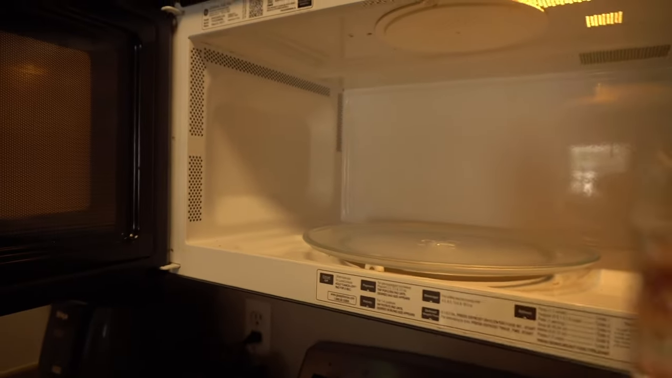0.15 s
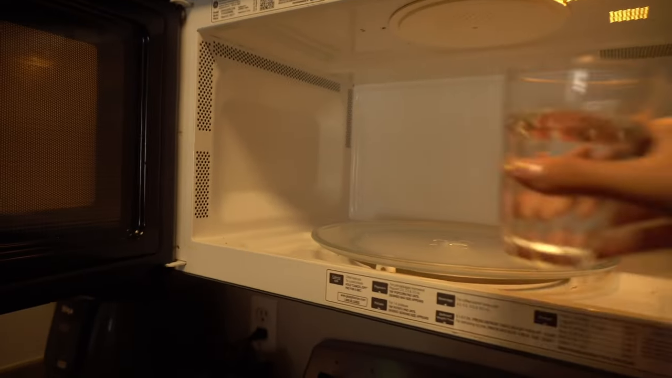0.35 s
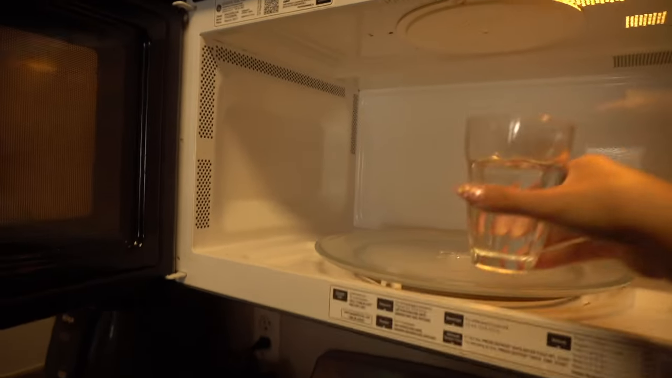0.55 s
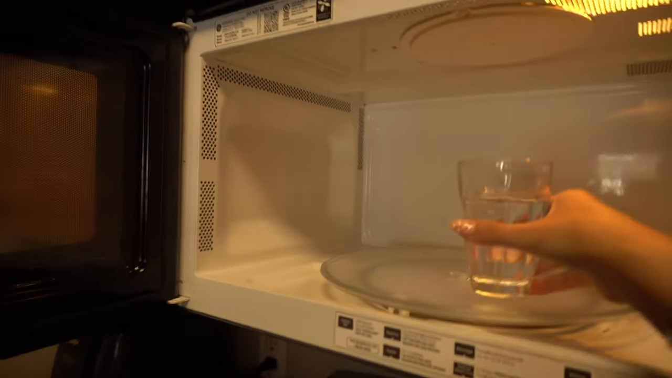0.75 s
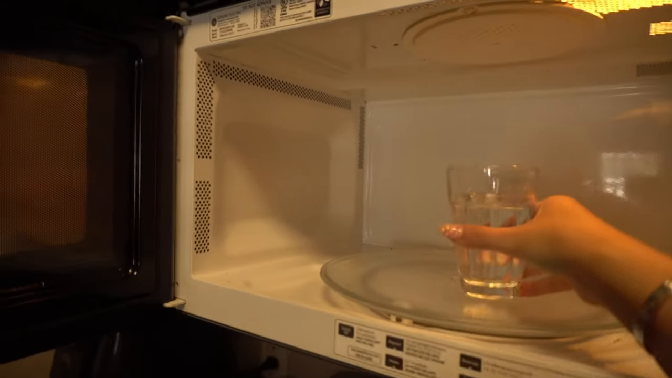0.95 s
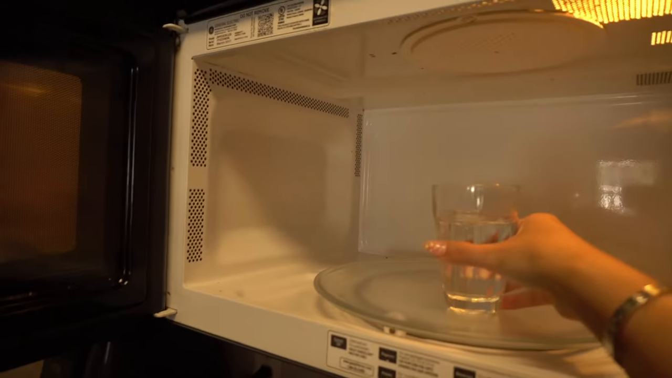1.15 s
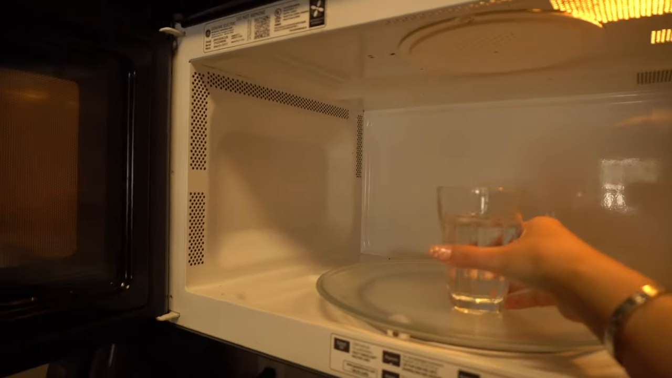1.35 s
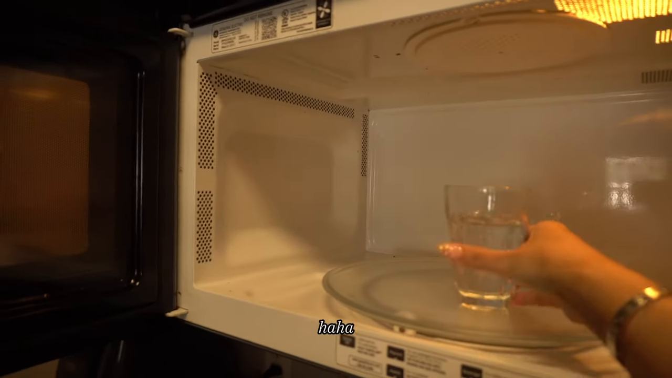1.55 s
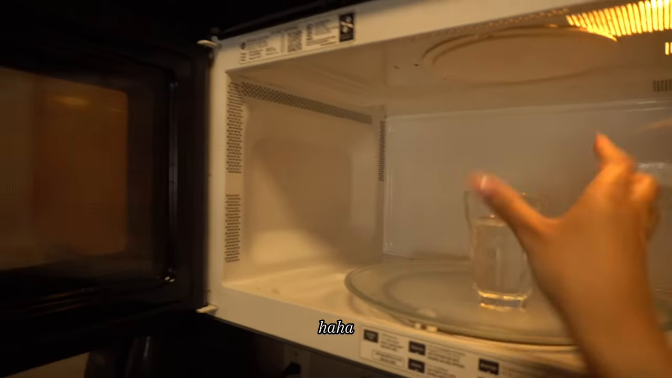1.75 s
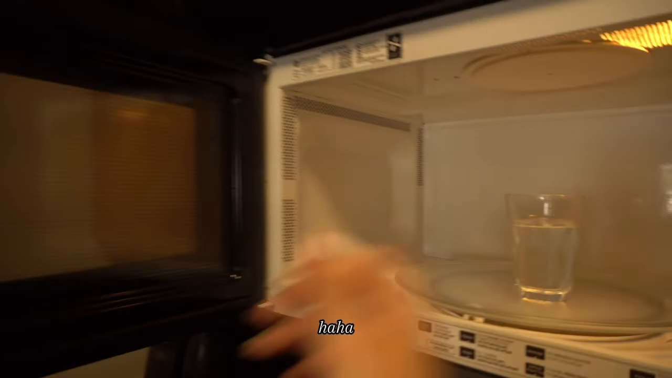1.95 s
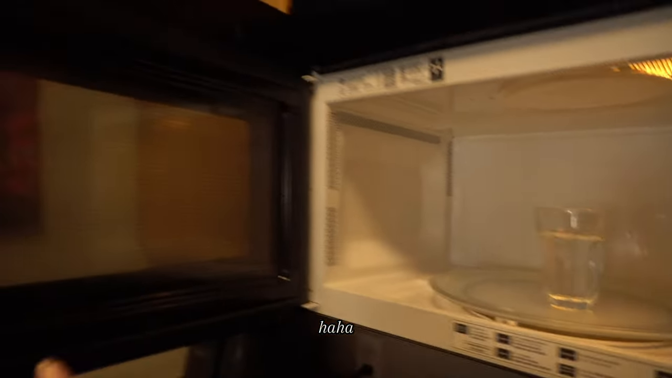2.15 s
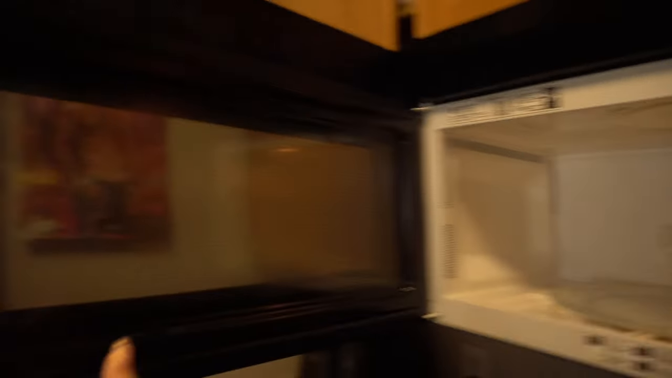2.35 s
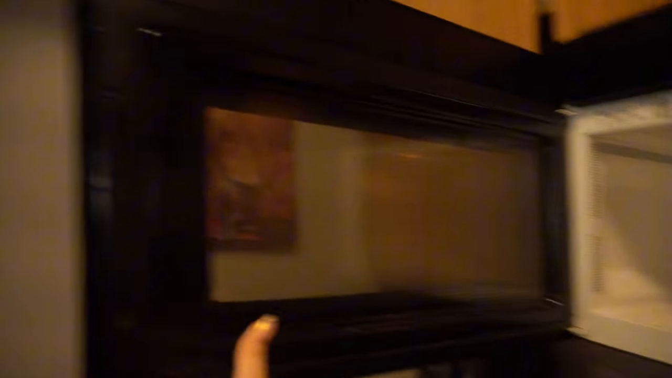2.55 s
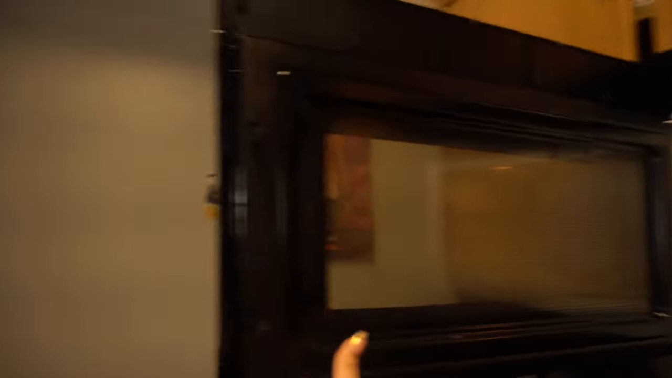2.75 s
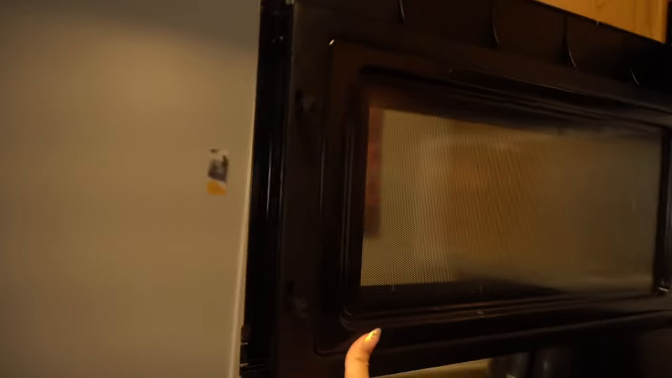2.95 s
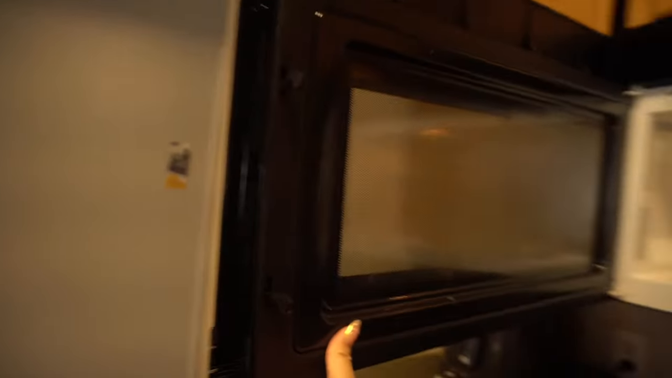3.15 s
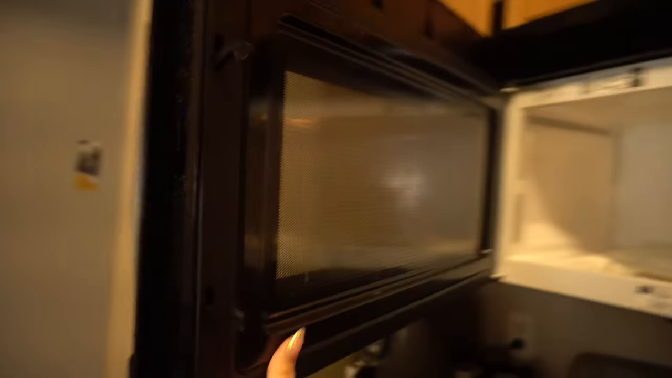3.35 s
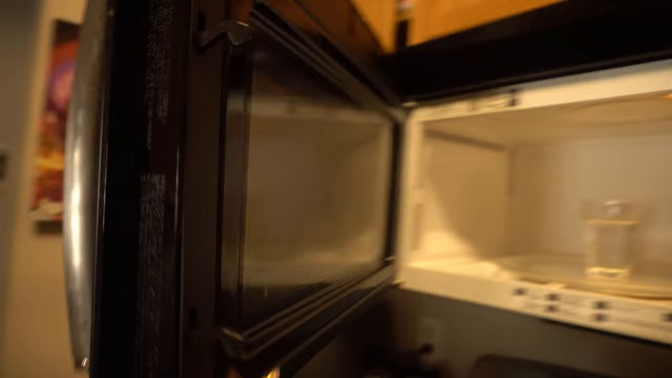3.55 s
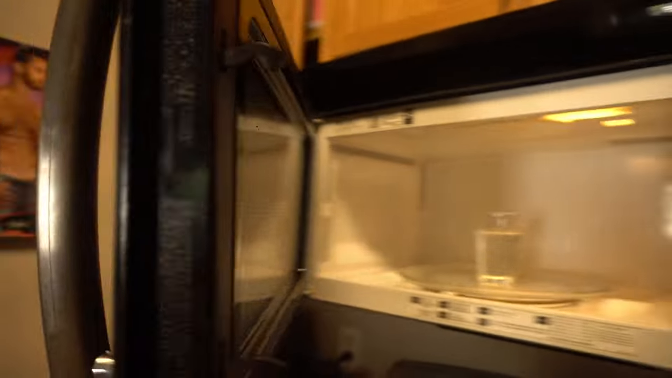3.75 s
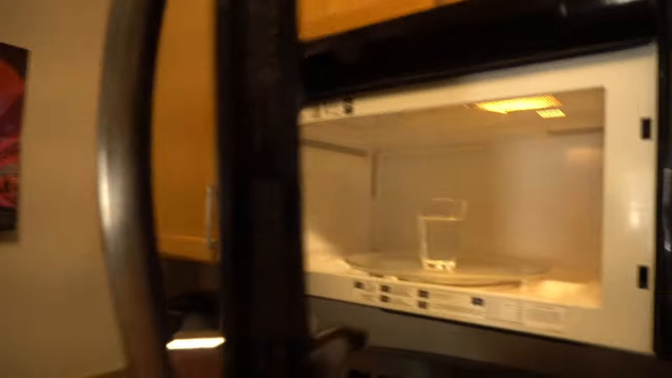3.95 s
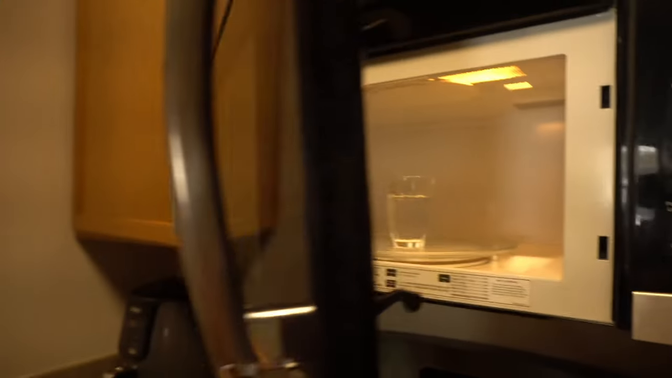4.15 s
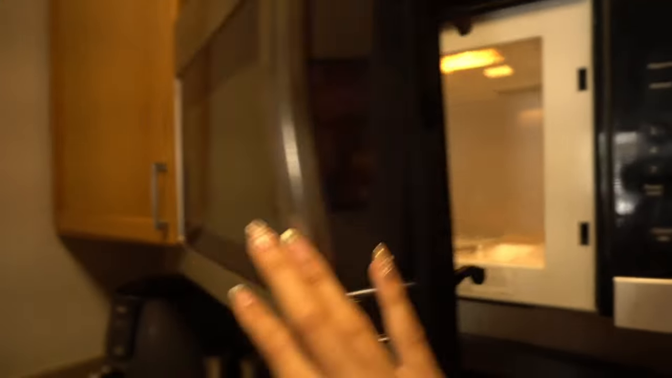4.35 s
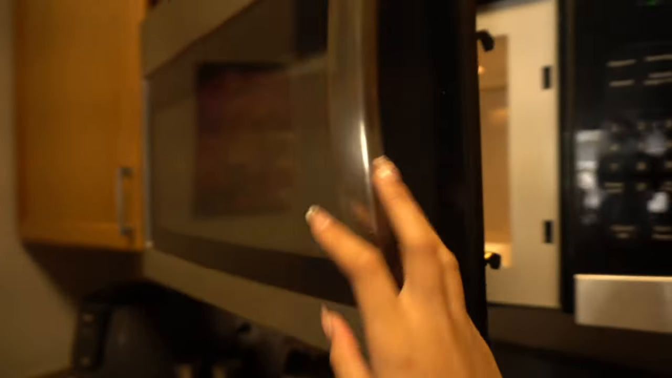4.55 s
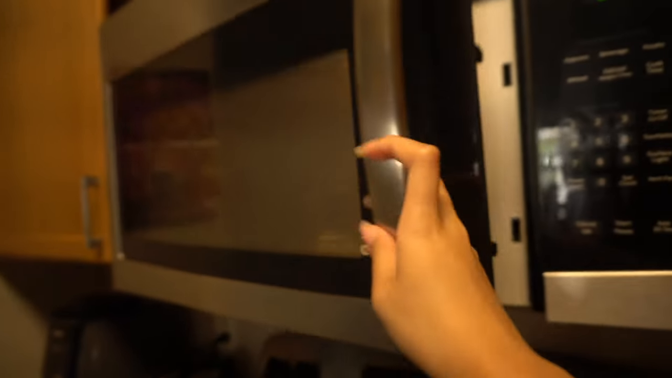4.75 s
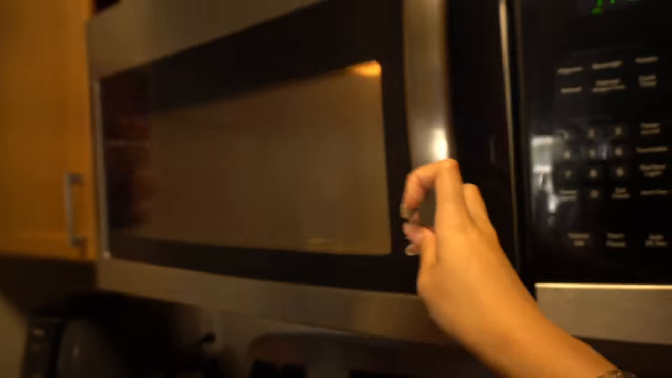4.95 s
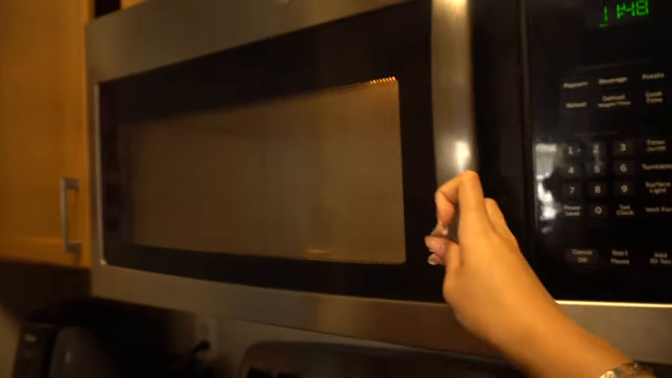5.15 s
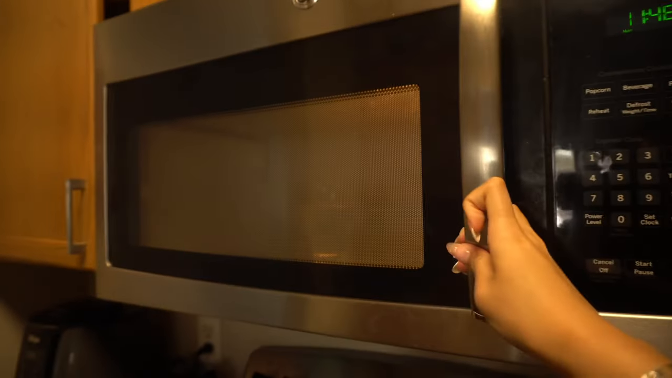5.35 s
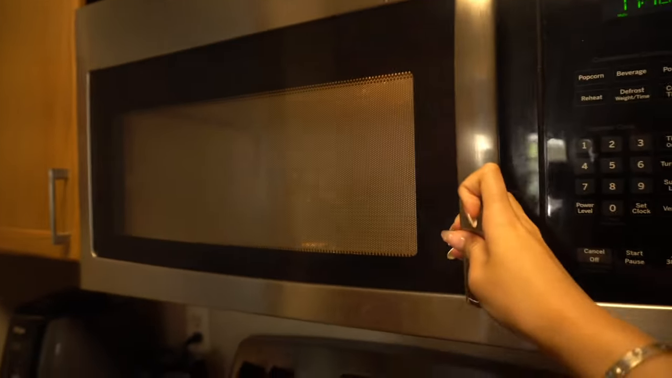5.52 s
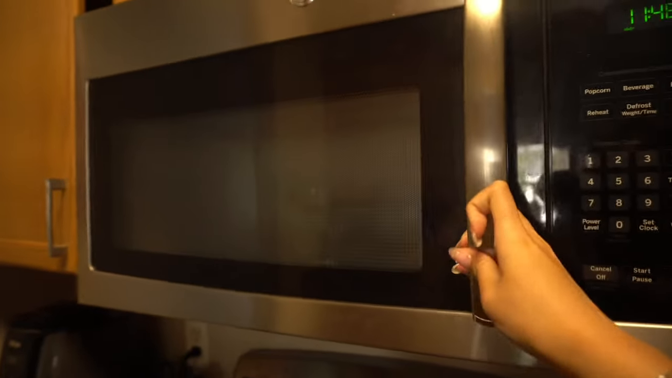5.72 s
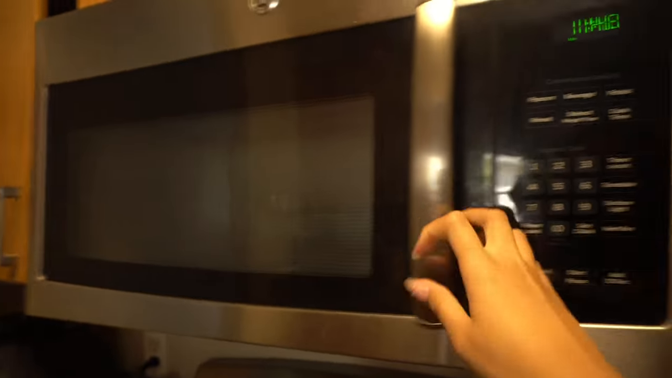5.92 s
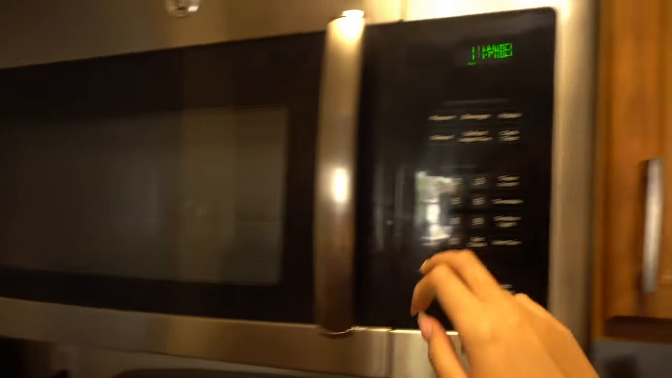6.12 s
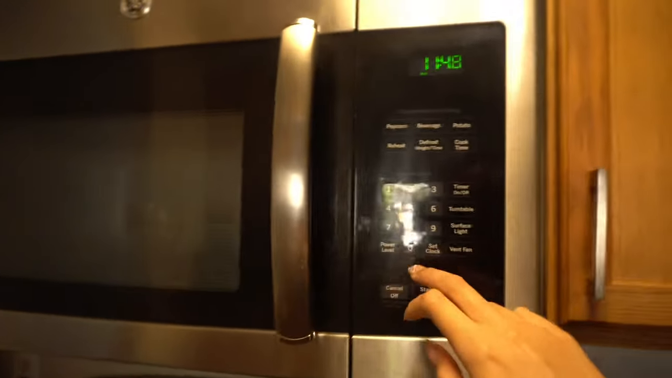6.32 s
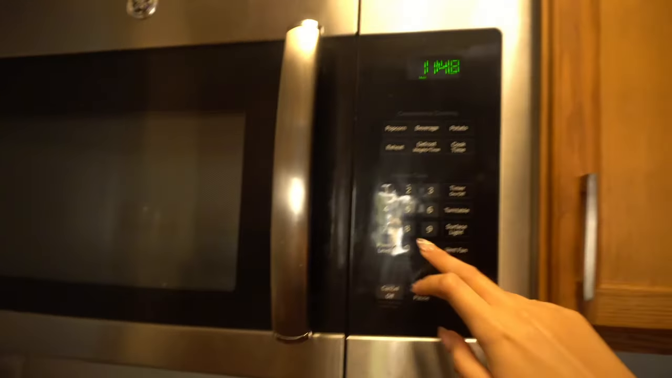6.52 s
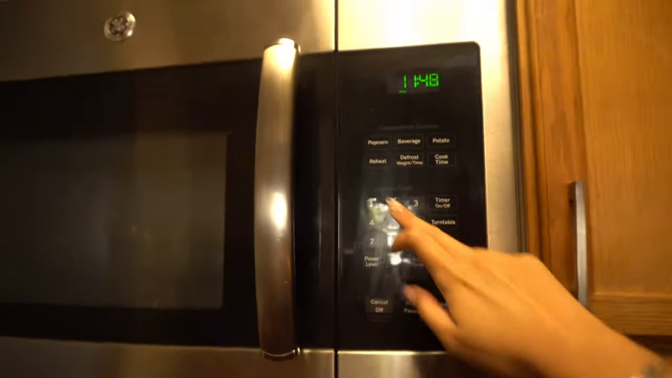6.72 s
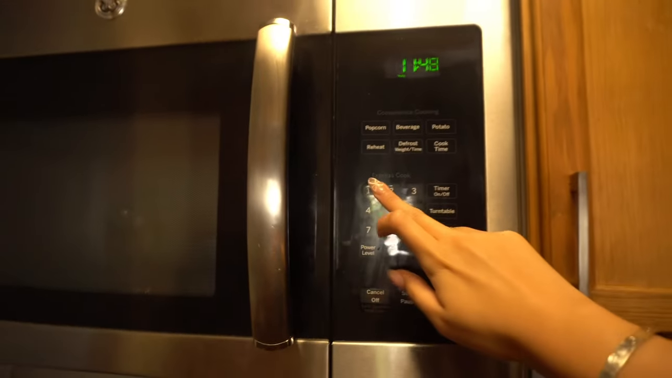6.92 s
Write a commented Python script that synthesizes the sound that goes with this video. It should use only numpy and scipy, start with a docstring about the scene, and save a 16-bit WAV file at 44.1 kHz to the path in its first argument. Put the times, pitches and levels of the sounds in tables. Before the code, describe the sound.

A glass of water clinks onto a microwave turntable, the plate rocks briefly, then the door squeaks and slams shut with a loud booming clack.

```python
"""A glass of water lands on a microwave oven's turntable: two clinks of ringing modes, then the plate rocks.
The door bumps its hinge stop, squeaks as it is swung round and is pushed shut: noise bursts for the latch
cracks, dying sines for the steel case that booms and rings, small cracks for loose parts that rattle.
A quiet, ringing kitchen (decaying noise as echoes) with rumble, hiss and hum; soft scuffs, small dry ticks."""
import sys
import numpy as np
from scipy import signal
from scipy.fft import rfft, irfft, next_fast_len
from scipy.io import wavfile

SR = 44100
rng = np.random.default_rng(int(sys.argv[2]) if len(sys.argv) > 2 else 0)


def inscribe(sig):
    """Save sig as 16-bit PCM at rate SR to the path in sys.argv[1].

    A 1-D sig is mono; a 2-D sig holds one channel per row.
    Samples are clipped to [-1, 1] before scaling.
    """
    pcm = np.round(np.clip(np.atleast_2d(sig).T, -1, 1) * 32767)
    wavfile.write(sys.argv[1], SR, pcm.astype(np.int16))


N = 307818
AGE = np.arange(SR) / SR  # the second after a blow

# how alike left and right are: pitch_hz, likeness (0 to 1)
ALIKE = [(300, 1), (640, 0.9), (1400, 0.64), (3100, 0.9), (7000, 0.26), (16000, 0.55)]
# steel panels of the case: pitch_hz, level_db, t60_s
PANELS = [(269.7, -4, 0.6), (292.6, 6.5, 0.17), (324.5, -5, 0.78), (382, -3, 0.3), (391, -8, 0.76),
          (420.7, -7, 0.69), (488, 0, 0.39), (603, -1, 0.1), (705, -9, 0.17), (918, -3, 0.25)]
# crack of the plastic latch and frame: pitch_hz, density_db_per_hz
CRACK = [(50, 5.5), (200, 2.5), (300, 13.5), (560, 7), (1000, 5), (1400, -1), (2600, -2.5), (3700, -6),
         (5500, -14.5), (10000, -19.5), (16000, -36.5)]
SHUT_S = 5.6015  # the latch drops home


def gain_of(db):
    """Decibels to amplitude."""
    return 10 ** (np.asarray(db) / 20)


def evened(x):
    """Scales to rms 1."""
    return x / np.sqrt(np.mean(x ** 2) + 1e-20)


def read(points, hz):
    """Reads a table on a log-frequency axis."""
    f, value = np.transpose(points)
    return np.interp(np.log(hz + 1), np.log(f + 1), value)


def add(mix, s, sound):
    """Mixes a sound in at time s, cut off at the end of the mix."""
    part = mix[:, round(s * SR):][:, :sound.shape[-1]]
    part += sound[..., :part.shape[1]]


def pan(db):
    """Left and right gains for a level difference; above zero is louder on the left."""
    return gain_of([[db / 2], [-db / 2]])


def fade(t, t60):
    """Falls by 60 dB in t60."""
    return np.exp(-np.log(1000) * t / t60)


def swell(rise):
    """Onset of a blow: the softer the contact, the slower the rise."""
    return 1 - np.exp(-AGE / rise)


def noise(colour, size, tilt_db=0, alike=ALIKE):
    """Stereo noise of rms 1 with a given spectrum, tilted per octave well above 500 Hz."""
    hz = np.fft.rfftfreq(size, 1 / SR)
    left, other = rfft(rng.standard_normal((2, size)))
    same = np.clip(read(alike, hz), -1, 1)
    right = same * left + np.sqrt(1 - same ** 2) * other
    spectrum_db = read(colour, hz) + tilt_db * np.log2(1 + hz / 500)
    return evened(irfft(np.array([left, right]) * gain_of(spectrum_db), size))


def burst(colour, t60, tilt_db=0, rise=0.000091):
    """The dense, quickly dying resonances of one contact, as fading noise."""
    return noise(colour, SR, tilt_db) * fade(AGE, t60) * swell(rise)


def ring(modes, rise, seconds=1):
    """Dying sines of alternating sign; a softer blow swells more slowly."""
    t = np.arange(seconds * SR) / SR
    sines = np.zeros(len(t))
    for k, (hz, db, t60) in enumerate(modes):
        sines += (-1) ** k * gain_of(db) * fade(t, t60) * np.sin(2 * np.pi * hz * t)
    return sines * (1 - np.exp(-t / rise))


def waver(step_s):
    """One second of a random curve of rms 1 that takes a new value every step."""
    steps = rng.standard_normal(SR)
    return evened(np.interp(AGE / step_s, np.arange(SR), steps))


def husky(hz, size):
    """Uneven slips smear a tone into a narrow band; each slip lasts size samples."""
    slips = evened(signal.fftconvolve(rng.standard_normal(SR), signal.windows.hann(size))[:SR])
    return slips * np.sin(2 * np.pi * np.cumsum(hz * np.ones(SR)) / SR)


def kitchen(x, build=0.0037):
    """Echoes of the oven cavity and the hard room: they thicken quickly, and the top treble dies first."""
    # dying of the echoes: pitch_hz, t60_s
    echo_t60 = [(60, 0.99), (150, 0.89), (400, 0.65), (1000, 0.7), (5000, 0.75), (9000, 0.53),
                (16000, 0.27)]
    hz, t, z = signal.stft(noise([(20, 0), (20000, 0)], SR), SR, nperseg=256)
    dying = z * fade(t, read(echo_t60, hz)[:, None])
    tail = signal.istft(dying, SR, nperseg=256)[1][:, :SR]
    # about as loud as the sound sent in, judged by the decay at 1 kHz
    tail *= swell(build) * np.sqrt(2 * np.log(1000) / (SR * read(echo_t60, 1000)))
    return signal.fftconvolve(x, tail, axes=1)[:, :x.shape[1]]


def air(level_db=-56.64):
    """Low rumble and hiss as steady coloured noise, with a faint mains hum of two sines."""
    # rumble and hiss: pitch_hz, density_db_per_hz
    air_colour = [(12, -30), (20, -4.5), (55, -0.5), (127, -15), (337, -16), (377, -18.5), (825, -22.5),
                  (2600, -30), (16000, -36.5)]
    # left and right differ more as the pitch rises: pitch_hz, likeness
    air_alike = [(60, 1), (130, 0.58), (290, 0.53), (640, 0.05)]
    # mains hum: pitch_hz, rms_level_db
    hum_tones = [(59.5, -73), (119, -68.5)]
    t = np.arange(N) / SR
    hum = np.zeros(N)
    for hz, db in hum_tones:
        hum += gain_of(db) * np.sqrt(2) * np.sin(2 * np.pi * (hz * t + rng.random()))
    return gain_of(level_db) * noise(air_colour, next_fast_len(N), alike=air_alike)[:, :N] + hum


def scuffs(wet_db=-1):
    """Short strokes that stick before they slip and one longer, grainy slide, a little way off."""
    # short strokes: start_s, level_db
    strokes = [(0.218, -55.5), (3.044, -53.5), (3.15, -55.5), (3.215, -44.5)]
    # friction: pitch_hz, density_db_per_hz
    friction = [(300, -13.5), (1100, -14), (1700, -3), (3000, -3.5), (7500, -10), (12000, -9), (16000, -19)]
    rise_s, t60_s, tilt_db = 0.0057, 0.27, -1  # tilt in dB per octave
    catch_hz, catch_db, catch_s = 1800, -2.5, 0.0147  # each stroke first scrapes in a narrow band
    slide_s, slide_length_s, slide_db = 3.335, 0.16, -48
    grain_db, grain_s = 0.5, .003  # uneven friction: rms depth, and length of one grain
    out = np.zeros((2, N))
    for s, db in strokes:
        catch_arch = np.sin(np.pi * np.minimum(AGE / catch_s, 1))
        catch = gain_of(catch_db) * catch_arch * husky(catch_hz, size=80)
        add(out, s, gain_of(db) * (catch + burst(friction, t60_s, tilt_db, rise_s)))
    # the slide speeds up and slows down in one arch
    speed = abs(np.sin(np.pi * np.minimum(AGE / slide_length_s, 1)))
    grain = evened(gain_of(grain_db * waver(grain_s)))
    add(out, slide_s, gain_of(slide_db) * speed * grain * noise(friction, SR))
    return out + gain_of(wet_db) * kitchen(out)


def ticks():
    """Dry, bright ticks close by; farther off, fingernails on the door are duller and the room answers."""
    # small ticks: start_s, level_db, distance_m (from the listener)
    contacts = [(0.7598, -37, 0.11), (2.45, -40.5, 0.37), (2.731, -38.5, 0.64), (2.785, -36.5, 0.57),
                (2.948, -33.5, 0.4), (3.781, -41.5, 0.52), (3.798, -37.5, 0.11), (4.0212, -41.5, 0.41),
                (4.593, -38, 0.87), (4.732, -37.5, 0.33), (6.5497, -53.5, 1), (6.7822, -35, 0.25),
                (6.786, -27, 0.14), (6.802, -47.5, 0.93)]
    # tick: pitch_hz, density_db_per_hz
    tick_colour = [(200, -26), (1000, 5.5), (3500, 2.5), (6000, -3.5), (10000, -5.5), (12500, -11.5),
                   (16000, -18)]
    room_radius_m = 0.94  # at this distance the room is as loud as the direct sound
    tilt_db, dulling_db = 4, 2.5  # brightness per octave there, and its loss with each doubling of distance
    t60_s, smear = .022, 0.262  # length there, and the power of distance by which it grows
    out, send = np.zeros((2, 2, N))
    for s, db, metres in contacts:
        far = metres / room_radius_m
        brightness_db = tilt_db - dulling_db * np.log2(far)
        tick = pan(1.4) * gain_of(db) * burst(tick_colour, t60_s * far ** smear, brightness_db)
        add(out, s, tick)
        add(send, s, far * tick)
    return out + kitchen(send)


def rocking(step_s=0.012, onset_s=.07):
    """The glass rocks at random, building up after each contact."""
    return waver(step_s) * swell(onset_s)


def flutter(depth=.3):
    """A gain that starts at one and wavers at random as the rocking builds up."""
    return 1 + depth * rocking()


def rocking_mode(hz, db, t60, rise, wobble_hz=11):
    """One plate mode under the rocking glass: the moving contact bends its pitch and its level."""
    turns = np.cumsum(hz + wobble_hz * rocking()) / SR
    return gain_of(db) * flutter() * fade(AGE, t60) * swell(rise) * np.sin(2 * np.pi * turns)


def glass(wet_db=-4, knock_wet_db=-8, knock_t60=0.13, clatter_db=-18, clatter_t60=0.35):
    """Contacts ring plate and tumbler: freely on the glass's edge, in a brief, higher flare once flat."""
    # glass on turntable: start_s, plate_db, knock_db (plate on its rollers), bright_db (extra near bright_hz)
    set_down = [(1.1586, -15, -26.5, -2.5), (1.194, -22, -24, -4), (1.226, -48, -25, 2),
                (1.2543, -13.5, -23.5, 5.5), (1.279, -32.5, -21.5, 16), (1.379, -36.5, -28.5, 3),
                (1.404, -38, -23.5, 2), (1.575, -51, -40, 7), (1.736, -69, -55, 1.5)]
    # turntable plate left undamped: pitch_hz, level_db, t60_s
    plate = [(1139, -8.5, .6), (1205, -1.5, 0.55), (1220, -12.5, 0.32), (1510, -24.5, .5),
             (1690, -22.5, 0.3), (1940, -16, 0.2), (2065, -5, 0.8), (3070, -8, 0.2), (3116, -16, 0.4),
             (3280, -17.5, .1), (3490, -22, .3), (4234, -21, 0.076)]
    # each part of the plate's ring leaves the cavity in its own direction: pitch_hz, left_minus_right_db
    plate_side = [(1200, -4.5), (2080, -9), (3100, -10)]
    # and reaches the room by its own share: pitch_hz, level_db
    plate_room = [(1200, -1.5), (2080, -10.5), (3100, -1.5)]
    # tumbler wall left undamped: pitch_hz, level_db, t60_s
    tumbler = [(4936, -7.5, 0.87), (5046, -7.5, 0.36), (5631, -9, 0.45), (6410, -6, 0.34),
               (6785, -16.5, 0.45), (7045, -20, 0.32), (8120, -12, 0.33), (8690, -22, .35),
               (9905, -20, 0.35), (11130, -24.5, 0.25), (11820, -25, .35), (13400, -25, .35),
               (14980, -25.5, .35)]
    # the plate's many weaker, crowded modes: pitch_hz, density_db_per_hz
    clatter = [(500, -21.5), (1400, 3.5), (3300, -3), (4500, -12.5), (7000, -31.5), (16000, -49.5)]
    # knock under the plate: pitch_hz, density_db_per_hz
    knock_colour = [(70, -20.5), (165, 3.5), (230, -11), (330, 4.5), (520, -6.5), (720, -0.5), (1000, -2),
                    (2000, -21.5), (16000, -59.5)]
    # roller ring and oven floor under the plate: pitch_hz, level_db, t60_s
    rollers = [(339.4, -4.5, .22), (457, -3.5, .1), (696.4, 2, 0.088), (861, -3, .14)]
    tumbler_db, rollers_db = -21, -5  # wall beside the plate (half of that once flat), rollers beside the knock
    bright_hz, bright_octaves = 2080, .2  # the part of the plate's ring that the flat base strikes best
    # the glass drops flat: its base stops the earlier ring, damps the later ones and raises their pitch
    flat_s, choke_t60_s, press_s, flat_rise_percent = 1.254, 0.051, 0.025, 0.64
    edge_rise_s, flat_rise_s = .0021, 0.0044  # the broad base strikes more softly than the edge
    out, send = np.zeros((2, 2, N))
    wall = sum(flutter() * ring([partial], rise=0.004) for partial in tumbler)
    for s, plate_db, knock_db, bright_db in set_down:
        flat = s >= flat_s
        if flat:
            damping = np.exp(-(AGE / press_s) ** 2)  # the base presses ever harder
            stiffening, rise, wall_share = 1 + flat_rise_percent / 100, flat_rise_s, 0.5
        else:
            damping = fade(np.maximum(s + AGE - flat_s, 0), choke_t60_s)
            stiffening, rise, wall_share = 1, edge_rise_s, 1
        for hz, db, t60 in plate:
            nearness = np.exp(-(np.log2(hz / bright_hz) / bright_octaves) ** 2)
            mode_db = plate_db + db + bright_db * nearness
            mode = damping * rocking_mode(hz * stiffening, mode_db, t60, rise)
            add(out, s, pan(read(plate_side, hz)) * mode)
            add(send, s, gain_of(read(plate_room, hz)) * mode)
        sparkle = pan(-1.5) * gain_of(plate_db + tumbler_db) * wall * damping * wall_share
        clink = sparkle + gain_of(plate_db + clatter_db) * burst(clatter, clatter_t60)
        # the plate tips and knocks dully on its rollers
        roller_ring = gain_of(rollers_db) * ring(rollers, rise=.005)
        knock = gain_of(knock_db) * (burst(knock_colour, knock_t60, rise=0.0073) + roller_ring)
        add(out, s, clink + knock)
        add(send, s, gain_of(wet_db) * clink + gain_of(knock_wet_db) * knock)
    return out + kitchen(send)


def hinge_stop(wet_db=-7, panel_db=-12, rise_s=0.0041, t60_s=0.18):
    """The door bumps its hinge stop: soft noise bursts, and steel panels whose ring is held short."""
    # bumps: start_s, level_db, brightness_db_per_octave
    bumps = [(2.634, -35.5, 4), (2.654, -37.5, 2.5), (2.672, -37, -16), (2.732, -32.5, 7)]
    # bump: pitch_hz, density_db_per_hz
    bump_colour = [(50, -17), (125, 4.5), (200, -30), (320, -2), (520, 0.5), (820, -8.5), (1000, -0.5),
                   (1400, -19.5), (2000, -22.5), (3000, -23.5), (6000, -36.5), (16000, -54)]
    out = np.zeros((2, N))
    held_panels = gain_of(panel_db) * fade(AGE, t60_s) * ring(PANELS, rise=rise_s)
    for s, db, tilt_db in bumps:
        add(out, s, gain_of(db) * (burst(bump_colour, t60_s, tilt_db, rise_s) + held_panels))
    return out + gain_of(wet_db) * kitchen(out)


def hinge_squeak(wet_db=-7):
    """The swinging hinge slips unevenly: a husky squeak, loud and high at the push, sinks over a low groan."""
    start_s, length_s, release_s = 4.592, 0.16, 0.01
    coasting_hz, push_hz, slowing_s = 1290, 167, 0.0418  # pitch, its rise at the push, time to settle
    coasting_db, push_db, push_peak_s, push_width_s = -63, 18, 0.029, 0.02  # level, and swell of the push
    groan_hz, groan_db, groan_t60_s = 316, -46, 0.76  # the door's frame
    out = np.zeros((2, N))
    hz = coasting_hz + push_hz * np.exp(-AGE / slowing_s)
    push = np.exp(-((AGE - push_peak_s) / push_width_s) ** 2)
    swing = np.exp(-np.maximum(AGE - length_s, 0) / release_s)
    squeak = gain_of(coasting_db + push_db * push) * husky(hz, size=600)
    groan = gain_of(groan_db) * fade(AGE, groan_t60_s) * husky(groan_hz, size=1200)
    add(out, start_s, swing * (squeak + groan))
    return out + gain_of(wet_db) * kitchen(out)


def handle_brushes(wet_db=-1, t60_s=0.72):
    """Fingers land on the steel handle and brush along it: airy noise that swells softly and dies slowly."""
    # brushes: start_s, level_db
    touches = [(4.6, -54), (4.719, -53)]
    # skin on steel: pitch_hz, density_db_per_hz
    brush_colour = [(400, 6.5), (1500, -3.5), (6000, -3), (15500, -0.5)]
    out = np.zeros((2, N))
    for s, db in touches:
        add(out, s, gain_of(db) * burst(brush_colour, t60_s, rise=0.0057))
    return out + gain_of(wet_db) * kitchen(out)


def rattle(count=14, top_db=-13, gap_s=.016, t60_s=0.92, click_t60_s=0.023):
    """Loose parts chatter in the shaken case: small cracks at uneven moments, dying away."""
    out = np.zeros((2, N))
    for k, (jitter, strength) in enumerate(rng.random((count, 2))):
        delay = (k + jitter) * gap_s
        level = gain_of(top_db) * strength * fade(delay, t60_s)
        add(out, SHUT_S + delay, level * burst(CRACK, click_t60_s))
    return out


def door_shut(crack_wet_db=1, latch_wet_db=-7, panel_wet_db=-5, boom_wet_db=-10):
    """Snaps crack and ring in the latch, thumps rock the whole case, and both ring the steel panels."""
    # hooks ride over their catches, drop home one after the other and settle:
    # start_s, crack_db, t60_s, brightness_db_per_octave
    snaps = [(5.5598, -17, 0.058, 3.5), (5.5648, -18, 0.026, -1), (5.6008, -12.5, 0.035, 5),
             (5.6076, -15.5, 0.02, 7.5), (5.6168, -15, 0.031, 5), (5.622, -13.5, 0.062, -1),
             (5.634, -17, 0.17, -3.5), (5.893, -41.5, 0.05, 6)]
    # the door's weight shoves the case: start_s, boom_db
    thumps = [(4.801, -49.5), (5.302, -42.5), (5.329, -35), (5.525, -39), (5.607, -26), (5.6152, -15.5),
              (5.634, -23)]
    # latch hooks and their spring: pitch_hz, level_db, t60_s
    latch_modes = [(320, -4, 0.14), (718, 4.5, 0.079), (2057, -1, 0.063), (3530, -15, 0.068),
                   (5530, -12.5, 0.035)]
    # the whole oven rocking on its mount: pitch_hz, level_db, t60_s
    boom_modes = [(31, -15, 0.81), (70.8, -11, 0.81), (80.3, 3.5, 0.37), (96.8, -4, 0.45),
                  (124.7, -1, 0.34), (143.8, -9.5, 0.47), (157.8, 1, 0.18)]
    # hooks meeting their catches with a short plastic rasp: pitch_hz, density_db_per_hz
    rasp = [(480, 5), (1300, -5), (2300, -1.5), (3100, -3), (3650, 2), (4300, -9), (16000, -27.5)]
    # a lightly damped metal part in the door, two close modes that beat: pitch_hz, level_db, t60_s
    beating = [(376, 0, 6), (385.75, -3, 6)]
    panel_per_snap_db, panel_per_thump_db = -21.5, -14.5  # share of each blow that rings the panels
    seated_db, beating_db = -16.5, -50  # once home, the hooks are held and ring less
    rasp_s, rasp_db, rasp_t60_s, rasp_rise_s = 5.302, -40, 0.37, 0.0009
    cracks, latches, panels, booms = np.zeros((4, 2, N))
    latch, boom = ring(latch_modes, rise=0.0019), ring(boom_modes, rise=0.0026)
    panel = ring(PANELS, rise=0.0017)
    for s, db, t60, tilt_db in snaps:
        crack = pan(-0.38) * gain_of(db) * burst(CRACK, t60, tilt_db)
        # each crack is followed by its own randomly drawn echoes
        add(cracks, s, crack + gain_of(crack_wet_db) * kitchen(crack))
        seated = s > SHUT_S - .01  # includes the snap that drops the latch home
        add(latches, s, pan(-0.27) * gain_of(db + seated_db * seated) * latch)
        add(panels, s, gain_of(db + panel_per_snap_db) * panel)
    latches += rattle()
    add(latches, rasp_s, gain_of(rasp_db) * burst(rasp, rasp_t60_s, rise=rasp_rise_s))
    for s, db in thumps:
        add(booms, s, gain_of(db) * boom)
        add(panels, s, gain_of(db + panel_per_thump_db) * panel)
    send = gain_of(latch_wet_db) * latches + gain_of(panel_wet_db) * panels + gain_of(boom_wet_db) * booms
    out = cracks + latches + panels + booms + kitchen(send)
    add(out, SHUT_S, gain_of(beating_db) * ring(beating, rise=.01, seconds=2))
    return out


def scene():
    """All sources together."""
    door = hinge_stop() + hinge_squeak() + handle_brushes() + door_shut()
    return air() + scuffs() + ticks() + glass() + door


def record(dry, ceiling=.65, edge_hz=16300):
    """The loudest peaks are rounded off; then a steep low-pass limits the band."""
    rounded = ceiling * np.tanh(dry / ceiling)
    low_pass = signal.firwin(301, edge_hz, window=("kaiser", 9), fs=SR)
    return signal.oaconvolve(rounded, low_pass[None], "same", axes=1)


dry = scene()
out = record(dry)
inscribe(out)
```